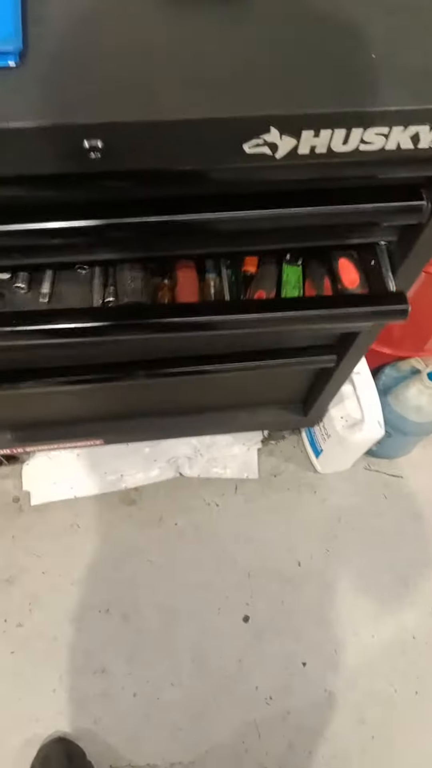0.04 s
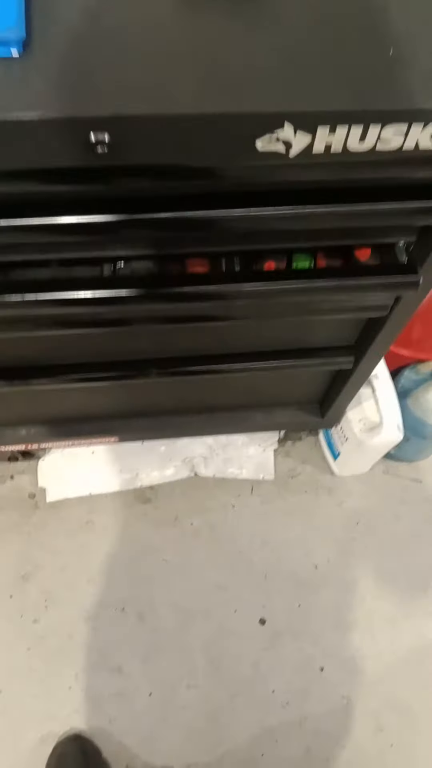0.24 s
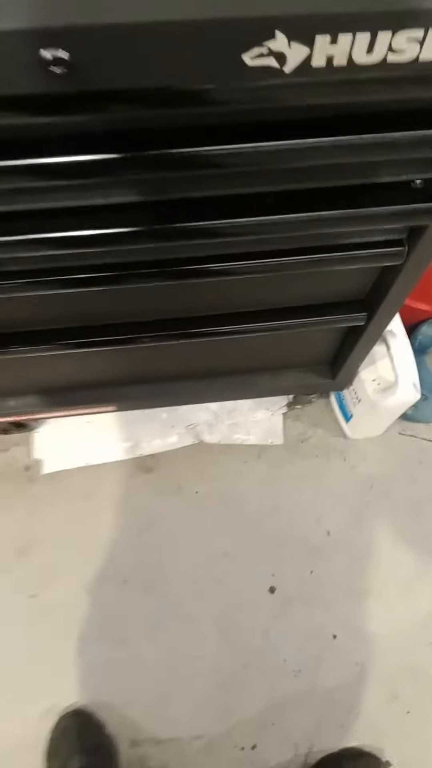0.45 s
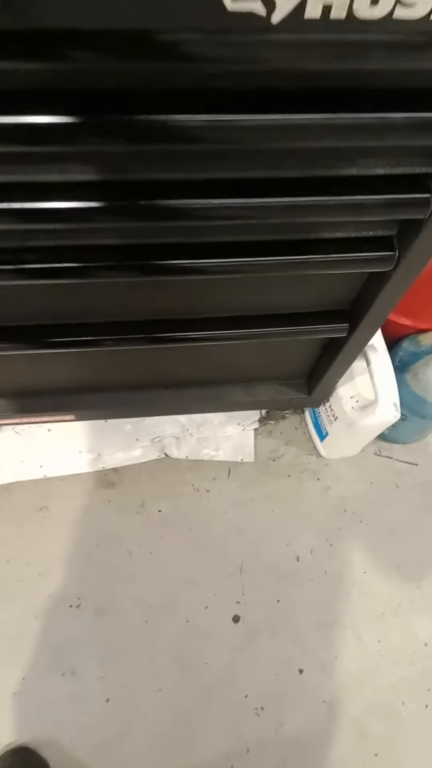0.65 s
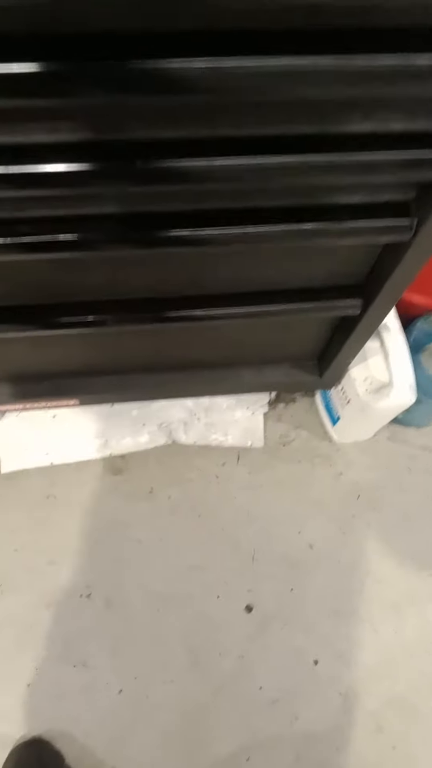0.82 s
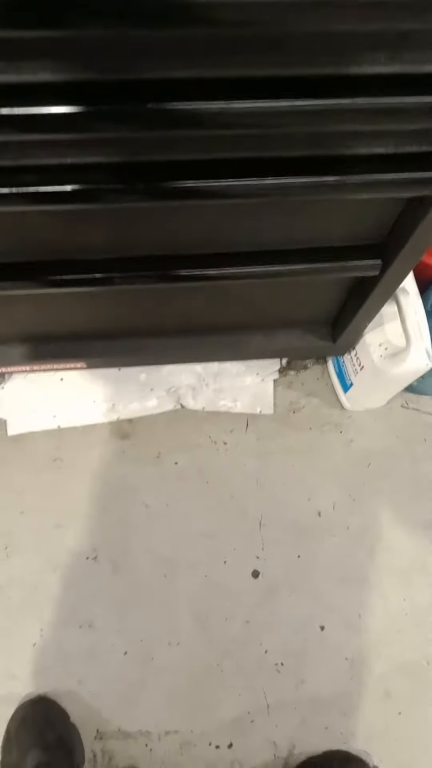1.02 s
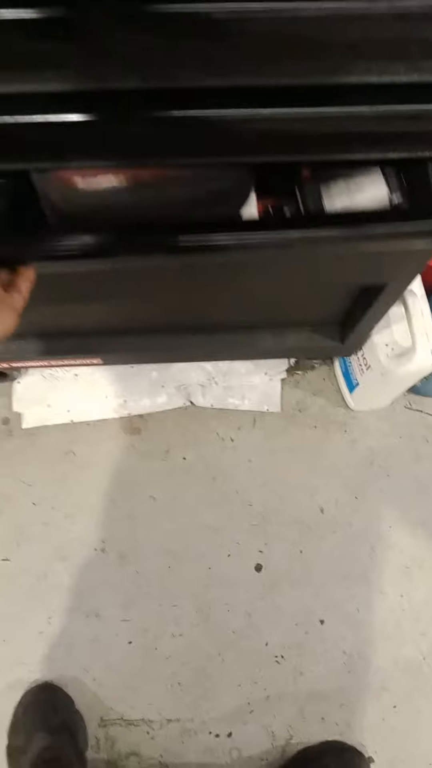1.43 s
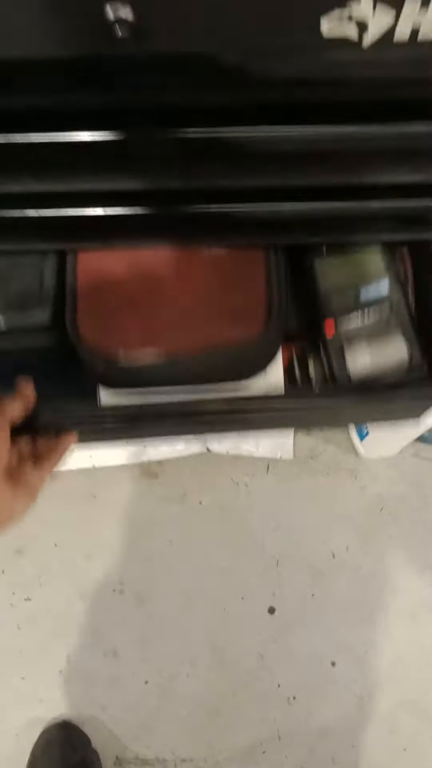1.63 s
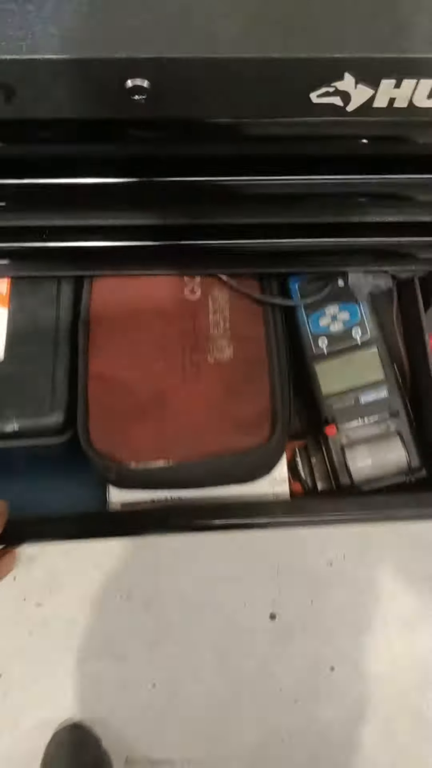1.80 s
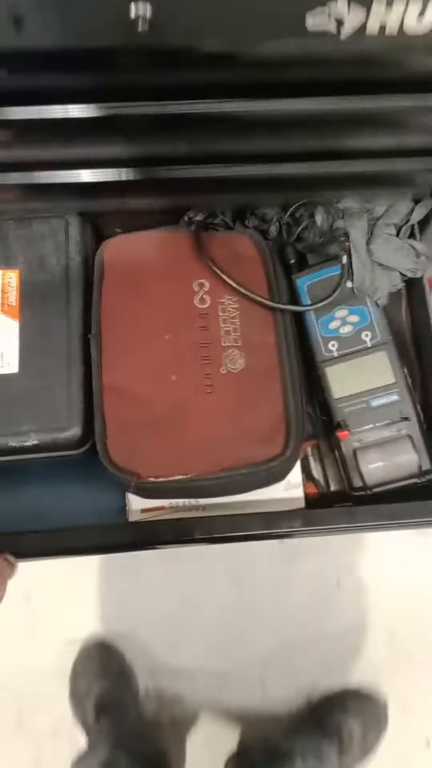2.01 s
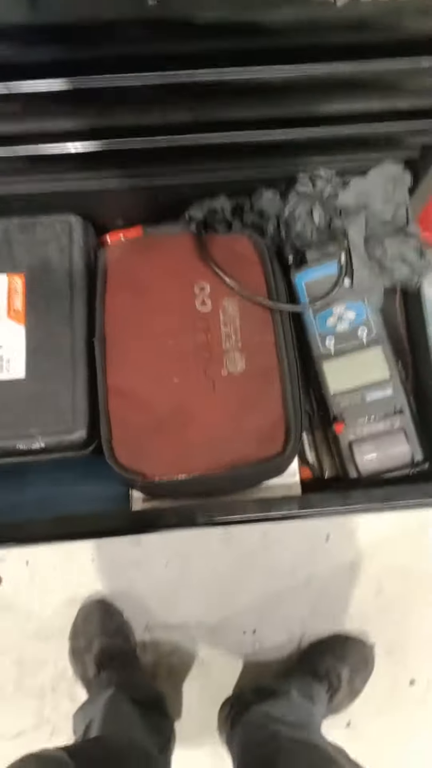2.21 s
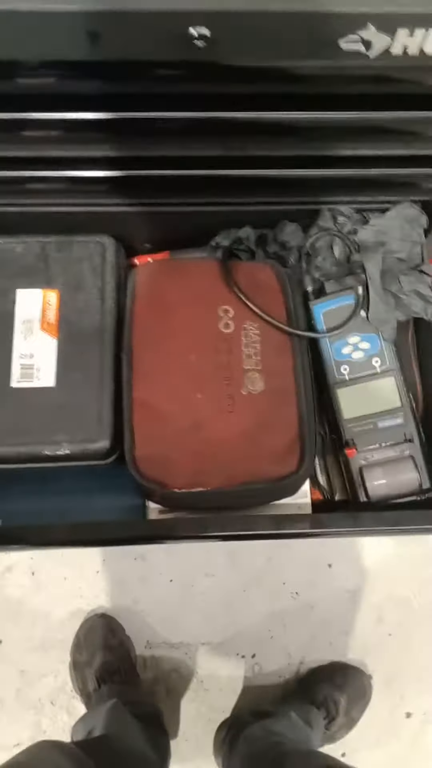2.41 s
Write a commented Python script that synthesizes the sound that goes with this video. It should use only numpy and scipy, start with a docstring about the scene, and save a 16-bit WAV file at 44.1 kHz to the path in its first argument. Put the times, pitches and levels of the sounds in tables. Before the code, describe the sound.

Steel tool chest drawers: one bangs closed, another slides out and stops with a booming clack.

```python
"""A soft thud, then a shallow steel drawer slams shut; its catch snaps and the tools in it clink.
A hand bumps the tool chest and pulls a deep drawer, which rolls out on ball slides with a squeak,
clicks, and clacks against its end stops with a low boom. Each blow rings the sheet steel.
Heard close up through one microphone, in a quiet garage with a faint, short tail."""
import sys
import numpy as np
from scipy import signal
from scipy.fft import rfft, irfft
from scipy.io import wavfile
from scipy.ndimage import map_coordinates

SR = 44100
rng = np.random.default_rng(int(sys.argv[2]) if len(sys.argv) > 2 else 0)


def to_wav(sig):
    """Store sig (one row per channel, or 1-D mono) as 16-bit WAV at the path in sys.argv[1].

    Samples outside -1..1 are clipped; the rate is SR.
    """
    pcm = np.clip(np.atleast_2d(sig), -1, 1) * 32767
    pcm = np.round(pcm).astype(np.int16)
    wavfile.write(sys.argv[1], SR, pcm.T)  # frames by channels


N = 112454
TIME = np.arange(N) / SR
CUTOFF_HZ = 16000

# Spectra of the room and the steel parts. Each row: frequency in Hz, relative level in dB.
ROOM_TONE_SPECTRUM = [(30, -20), (62, -10), (120, -1), (250, -4), (500, -9), (790, -15.5), (1300, -15),
                      (2000, -19), (2800, -19.5), (4000, -25), (6500, -29), (8000, -38.5), (10000, -35),
                      (13000, -33), (16000, -35)]
GARAGE_SPECTRUM = [(100, 4), (700, -3), (15000, -10)]
THUD_SPECTRUM = [(35, -16), (75, 6), (130, -2), (170, -9), (230, -6), (450, -14), (800, -21), (1600, -27),
                 (4000, -42), (8000, -60)]
ROLL_SPECTRUM = [(60, -48), (130, -10.5), (300, 6.5), (480, 1), (700, -14.5), (1000, -17), (1220, -9),
                 (1600, -12), (4200, -13.5), (6500, -16), (8500, -36), (13000, -24.5), (16000, -30)]
CLICK_SPECTRUM = [(700, -9.5), (1800, -12.5), (3000, -15.5), (4500, -7.5), (6500, -0.5), (8300, 0),
                  (9800, -7), (11500, 14), (13400, -5), (14600, 12.5), (16000, -9)]
TAB_SPECTRUM = [(1000, -8.5), (4500, -8.5), (6500, -2.5), (10000, -14), (11400, 5.5), (13400, 2),
                (14500, 6), (16000, 1.5)]
DEEP_SPECTRUM = [(70, 3.5), (130, 2.5), (300, 5), (550, -11.5), (900, -10.5), (1300, -13.5), (2400, -13),
                 (4800, -16), (8000, -40.5), (15000, -49)]
CATCH_SPECTRUM = [(900, 2), (2400, -4.5), (3400, -5), (5000, -0.5), (6800, 1.5), (7900, -12), (10800, 7),
                  (12500, 5.5), (13700, 1), (15300, 5)]
SHALLOW_SPECTRUM = [(100, -6), (280, 3), (550, 4), (850, 8), (1200, 3), (1450, 6.5), (1800, -4.5),
                    (2350, 5), (3400, -7.5), (4800, -3), (5700, -16), (8000, -18), (15000, -26)]

# How long the parts ring. Each row: frequency in Hz, seconds to fall 60 dB.
THUD_DECAY = [(80, 0.19), (300, 0.16), (3000, 0.9)]
ROLL_DECAY = [(200, 0.16), (5000, 0.04), (12000, 0.032)]
CLICK_DECAY = [(1000, 0.26), (5000, 0.081), (15000, 0.029)]
CATCH_DECAY = [(1000, 0.24), (5000, 0.1), (15000, 0.042)]
SHEET_DECAY = [(100, 0.38), (400, 0.5), (1200, 0.084), (5000, 0.19), (15000, 0.44)]

# Their distinct notes. Each row: frequency in Hz, relative level in dB, seconds to fall 60 dB.
PANEL_MODES = [(221, 5.5, 0.19), (280, -10, 0.063)]
RAIL_MODES = [(2340, 3, 0.03), (2750, 2, 0.011)]
TRACK_MODES = [(3900, 0, .012), (4400, -1, .018), (5600, -6, .014)]
LOAD_MODES = [(263, -0.5, 0.35), (298.7, -6, 0.53), (344, 6, 0.16), (406, 0, 0.087), (485.6, -5, 0.26),
              (970, -28, .1), (1232, -21.5, 0.51)]
CLICK_MODES = [(1810, -15.5, 0.1), (4420, -11, 0.057), (4900, -23, 0.06)]
DEEP_MODES = [(87.2, -24, 0.46), (120.6, -17, 0.43), (150.6, -9, 0.52), (223.4, 5, 0.32), (256.3, -5, 0.2),
              (300, -7, 0.12), (348.6, -5.5, 0.22), (397, -15.5, 0.37), (423.5, -11, 0.23),
              (585, -17, 0.25), (730, -7.5, 0.081), (897, -12, 0.16), (960, -19, 0.17), (1806, -11, 0.056),
              (2464, -12.5, 0.09)]
TOOL_MODES = [(3912, -1, .075), (3850, -6, .075), (9520, -19, .12), (15700, -12, .06)]
SHALLOW_MODES = [(262, 1.5, 0.071), (299, 6, 0.082), (363.4, -8, 0.63), (410, -9.5, 0.14),
                 (514.5, -13.5, 0.41), (635, -9, 0.18), (704, 0, 0.18), (796, -14, 0.2), (875, -3.5, 0.17),
                 (993, -12, 0.18), (1060, -12.5, 0.15), (1370, -10, 0.089), (1465, -9, 0.058),
                 (1534, -15, 0.18), (2237, -24, 0.3), (2383, -19.5, 0.23), (3040, -37, 0.082),
                 (4710, -21, 0.13)]

# Blows and rebounds. Each row: start in seconds, level of the crash in dB, level of the notes in dB.
HAND_THUDS = [(.0, -58, -66), (1.0, -61, -63), (1.178, -59, -60.5), (1.205, -53.5, -63),
              (1.355, -51.5, -82), (1.44, -57, -103), (1.515, -51, -76), (1.56, -55.5, -80)]
SLIDE_CLICKS = [(2.0325, -36.5, -38)]
END_STOP_HITS = [(2.179, -45, -42), (2.1895, -34.5, -33), (2.201, -45, -44), (2.220, -56, -55),
                 (2.236, -58, -47)]
FRAME_SLAMS = [(.148, -48.5, -60), (.172, -41.5, -42.5), (.1805, -36, -29.5), (.189, -41, -47),
               (.209, -41.5, -41), (.239, -46, -47), (.252, -70, -42.5)]

# Small contacts. Each row: start in seconds, level in dB.
LOAD_BUMPS = [(1.525, -54), (1.552, -61.5), (1.598, -62), (1.635, -66.5), (1.786, -49), (1.793, -49.5),
              (1.828, -58), (1.862, -54)]
STOP_TAB_TICKS = [(2.1672, -43.5), (2.1772, -34), (2.192, -44)]
CATCH_SNAPS = [(.1465, -47), (.185, -36), (.209, -65), (.239, -41.5), (.243, -39.5)]
TOOL_CLINKS = [(.2855, -44.5), (.291, -51), (.305, -55)]

# Rolling and friction as the deep drawer travels. Each row: time in seconds, level in dB.
ROLL_LEVEL = [(1.42, -76), (1.53, -59.5), (1.60, -63.5), (1.70, -62), (1.82, -55.5), (1.92, -60.5),
              (2.02, -68), (2.15, -68), (2.2, -39)]
RAIL_RUB_LEVEL = [(1.53, -85), (1.58, -65.5), (1.605, -57), (1.63, -66), (1.68, -63), (1.71, -70.5),
                  (1.76, -68.5), (1.9, -76)]
DETENT_LEVEL = [(1.44, -86), (1.52, -71), (1.62, -88)]
# The tracks scraping. Each row: time in seconds, level in dB, pitch ratio.
TRACK_SCRAPE = [(1.62, -80, .97), (1.72, -71, .98), (1.82, -65.5, 1.0), (1.92, -72, 1.05), (2.02, -75, 1.1)]
# Loose steel singing. Each row: start in seconds, frequency in Hz, peak level in dB, length in seconds.
LOOSE_RINGS = [(.152, 865, -41, .05), (.29, 705, -55, .065), (.345, 2835, -68, .075),
               (.40, 2830, -78.5, .55)]


def from_db(db):
    """Decibels to gain."""
    return 10 ** (np.asarray(db) / 20)


def rms_one(x):
    """Scale to rms 1."""
    return x / np.sqrt(np.mean(x ** 2) + 1e-20)


def at_hz(points, hz):
    """Read a table on a log-frequency axis."""
    freqs, values = np.transpose(points)
    return np.interp(np.log(hz), np.log(freqs), values)


def level(rows):
    """Gain over time from (s, dB) rows, silent outside them."""
    return from_db(np.interp(TIME, *np.transpose(rows), left=-150, right=-150))


def noise(spectrum, n=N):
    """Noise with the given spectrum; rms 1."""
    hz = np.maximum(np.arange(n // 2 + 1) * SR / n, 1)
    return rms_one(irfft(rfft(rng.standard_normal(n)) * from_db(at_hz(spectrum, hz)), n))


def modes(table):
    """One second of decaying sines, alternating in sign."""
    t = TIME[:SR]
    return sum((-1) ** k * from_db(db - 60 * t / t60) * np.sin(2 * np.pi * hz * t)
               for k, (hz, db, t60) in enumerate(table))


def build_up(x, rise_s):
    """Soften the onset of a sound."""
    return x * (1 - np.exp(-TIME[:len(x)] / rise_s))


def steel(spectrum, t60s, peaky_db):
    """Crowded modes of one steel part; returns a maker of fresh rings that die band by band."""
    t, hz = TIME[:SR], np.arange(SR // 2 + 1) + 1.
    peak_width_hz = 24.9 + .012 * hz
    peak_heights = np.clip(rng.standard_normal(SR), -2, 2)
    ripple = np.interp(np.cumsum(1 / peak_width_hz), np.arange(SR), peak_heights)
    gains = from_db(at_hz(spectrum, hz) + peaky_db * ripple) * (hz < CUTOFF_HZ)
    centres = np.geomspace(50, CUTOFF_HZ, 9)
    bands = np.array([np.interp(np.log(hz), np.log(centres), row) for row in np.eye(len(centres))])
    decays = from_db(-60 * t / at_hz(t60s, centres)[:, None]) / np.std(irfft(gains, SR))

    def ring():
        phases = np.exp(2j * np.pi * rng.random(len(hz)))
        return (irfft(bands * gains * phases, SR) * decays).sum(0)
    return ring


def strike(events, response):
    """Sum one response for each (s, dB) event."""
    out = np.zeros(N + SR)
    for start_s, db in events:
        i = int(start_s * SR)
        out[i:i + SR] += from_db(db) * response()
    return out[:N]


def blows(rows, sheet, table, rise_s, crack_db=-60, crack_s=.005):
    """Each blow sets off a crash of the sheet and its notes; a hard one also cracks."""
    rows, notes = np.array(rows), build_up(modes(table), rise_s)
    crack = 1 + from_db(crack_db) * np.exp(-TIME[:SR] / crack_s)
    crashes = strike(rows[:, :2], lambda: build_up(sheet() * crack, rise_s))
    return crashes + strike(rows[:, ::2], lambda: notes)


def singing(drive, table, ratio):
    """Ring resonances and let their pitch glide by a ratio over time; rms 1."""
    ring = signal.fftconvolve(drive, modes(table))
    return rms_one(map_coordinates(ring, [np.cumsum(ratio)], order=3, mode="mirror"))


def room_tone():
    """Still air around the microphone: a low, steady hush."""
    return from_db(-68.3) * noise(ROOM_TONE_SPECTRUM)


def garage(direct, tail_db=-33, t60_s=.4):
    """The walls return a diffuse tail, far below the direct sound."""
    tail = build_up(noise(GARAGE_SPECTRUM, SR) * from_db(-60 * TIME[:SR] / t60_s), rise_s=.11)
    return from_db(tail_db) * signal.fftconvolve(direct, tail / np.linalg.norm(tail))[:N]


def hand():
    """A hand meets the panels softly, so they give dull thuds."""
    return blows(HAND_THUDS, steel(THUD_SPECTRUM, THUD_DECAY, peaky_db=7), PANEL_MODES, rise_s=.0043)


def loose_parts():
    """Loose steel parts sing up and fade again."""
    return sum(from_db(db) * np.sin(np.pi * np.clip((TIME - start) / length, 0, 1)) ** 2
               * np.sin(2 * np.pi * hz * TIME) for start, hz, db, length in LOOSE_RINGS)


def slides(ticks_per_s=1000, grain_db=2.5, hiss_db=-1.5, squeak_sharp=.15, settle_s=.046):
    """Balls tick along the rails and shake the panels; a rail squeaks downward, the tracks scrape upward."""
    sizes = from_db(grain_db * np.minimum(rng.exponential(1, N), 4)) * rng.choice([-1, 1], N)
    ticks = rms_one(sizes * (rng.random(N) < ticks_per_s / SR))
    balls = ticks + from_db(hiss_db) * rng.standard_normal(N)
    rubbing_s = np.maximum(TIME - RAIL_RUB_LEVEL[0][0], 0)
    rail = singing(balls, RAIL_MODES, 1 + squeak_sharp * np.exp(-rubbing_s / settle_s))
    scrape = np.array(TRACK_SCRAPE)
    tracks = singing(balls, TRACK_MODES, np.interp(TIME, scrape[:, 0], scrape[:, 2]))
    sheet = steel(ROLL_SPECTRUM, ROLL_DECAY, peaky_db=2)
    panels = rms_one(signal.fftconvolve(balls, sheet())[:N])
    return level(ROLL_LEVEL) * panels + level(RAIL_RUB_LEVEL) * rail + level(scrape[:, :2]) * tracks


def deep_drawer():
    """The detent lets go, the load bumps, the slides click and the drawer booms at full extension."""
    sheet = steel(DEEP_SPECTRUM, SHEET_DECAY, peaky_db=4)
    latch = steel(CLICK_SPECTRUM, CLICK_DECAY, peaky_db=2.5)
    tab = steel(TAB_SPECTRUM, CLICK_DECAY, peaky_db=5.5)
    click = blows(SLIDE_CLICKS, latch, CLICK_MODES, rise_s=.00096, crack_db=-10)
    tabs = strike(STOP_TAB_TICKS, lambda: build_up(tab(), rise_s=.00023))
    boom = blows(END_STOP_HITS, sheet, DEEP_MODES, rise_s=.00033, crack_db=-2.5)
    detent = level(DETENT_LEVEL) * noise(CLICK_SPECTRUM)
    load = strike(LOAD_BUMPS, lambda: build_up(modes(LOAD_MODES), rise_s=.0011))
    return detent + load + click + tabs + boom


def shallow_drawer(seated_s=.273, damping_db_per_s=314):
    """The slam rings the drawer until it seats and the frame damps it; its catch snaps, a tool clinks."""
    sheet = steel(SHALLOW_SPECTRUM, SHEET_DECAY, peaky_db=1)
    spring = steel(CATCH_SPECTRUM, CATCH_DECAY, peaky_db=1.5)
    catch = strike(CATCH_SNAPS, lambda: build_up(spring(), rise_s=.0011))
    slam = blows(FRAME_SLAMS, sheet, SHALLOW_MODES, rise_s=.0014)
    damping = from_db(-damping_db_per_s * np.maximum(TIME - seated_s, 0))
    tool = strike(TOOL_CLINKS, lambda: modes(TOOL_MODES))
    return damping * slam + catch + tool


def scene():
    """The chest close by and the garage behind it, in mono."""
    chest = shallow_drawer() + loose_parts() + deep_drawer() + slides() + hand()
    return (chest + garage(chest) + room_tone())[None]


def record(dry):
    """A 55 Hz low cut on the microphone and a steep cut of the highest treble."""
    dry = signal.sosfilt(signal.butter(4, 55, "high", fs=SR, output="sos"), dry)
    return signal.sosfilt(signal.ellip(10, .1, 70, CUTOFF_HZ, fs=SR, output="sos"), dry)


dry = scene()
out = record(dry)
to_wav(out)
```